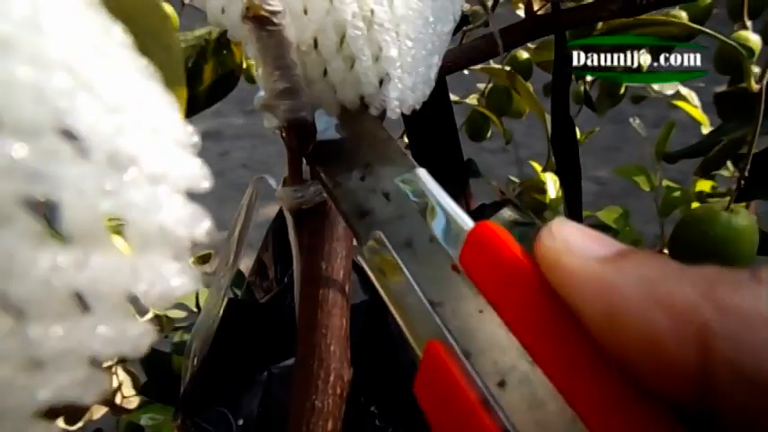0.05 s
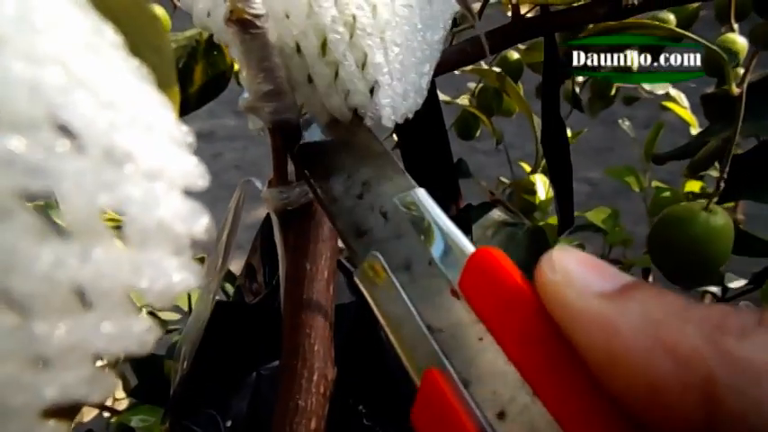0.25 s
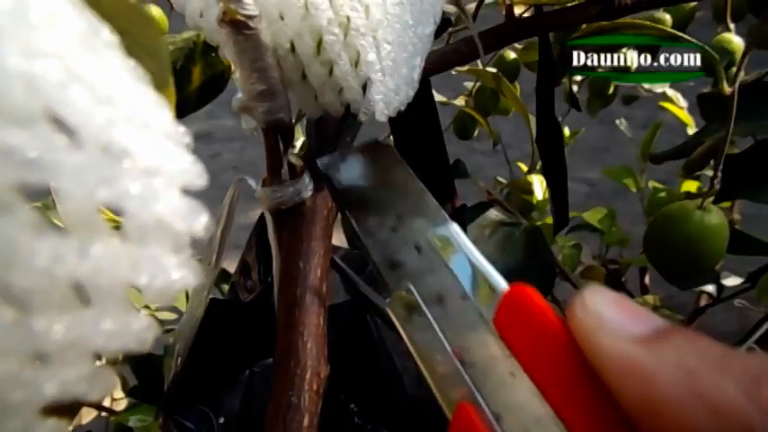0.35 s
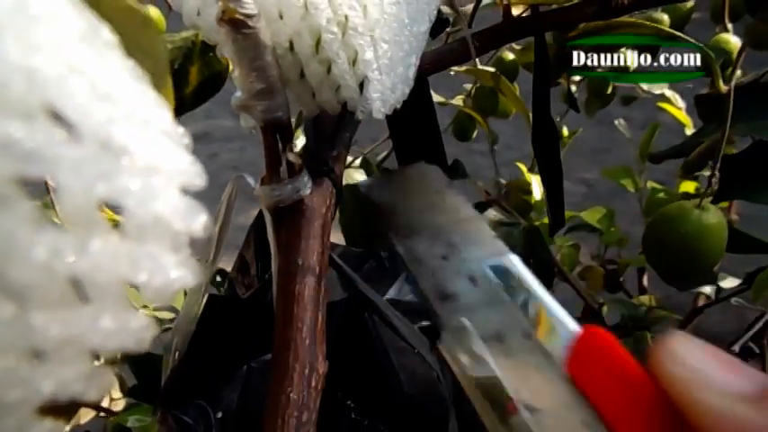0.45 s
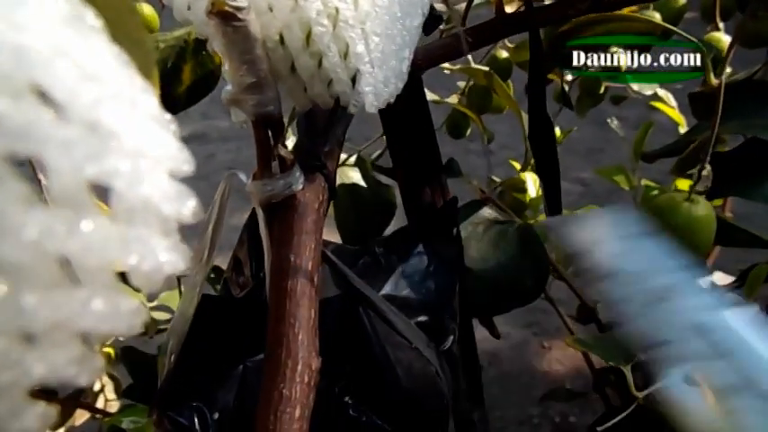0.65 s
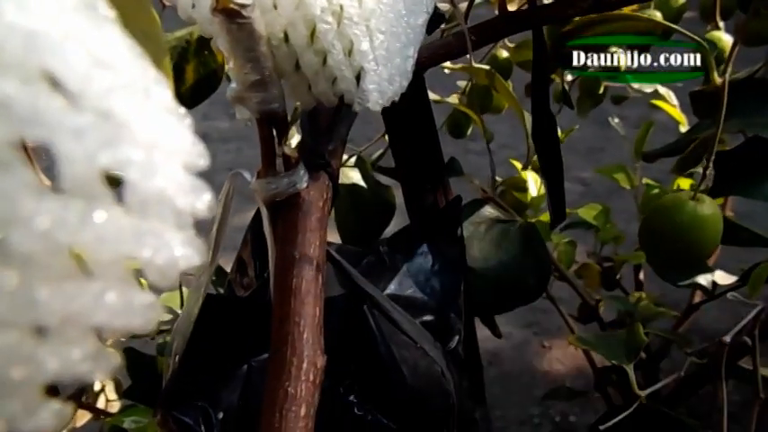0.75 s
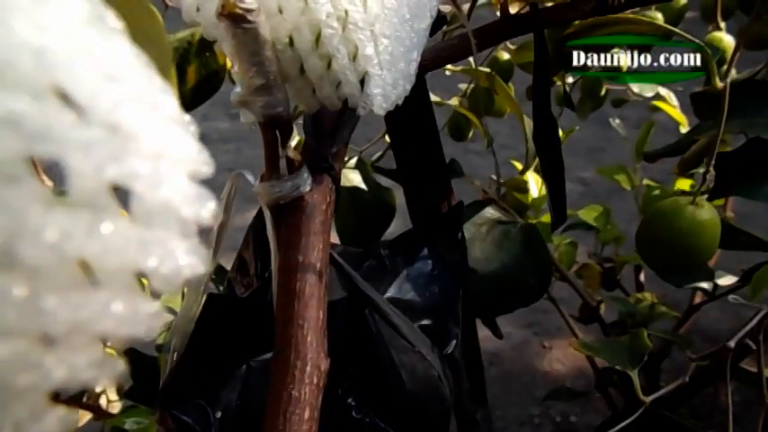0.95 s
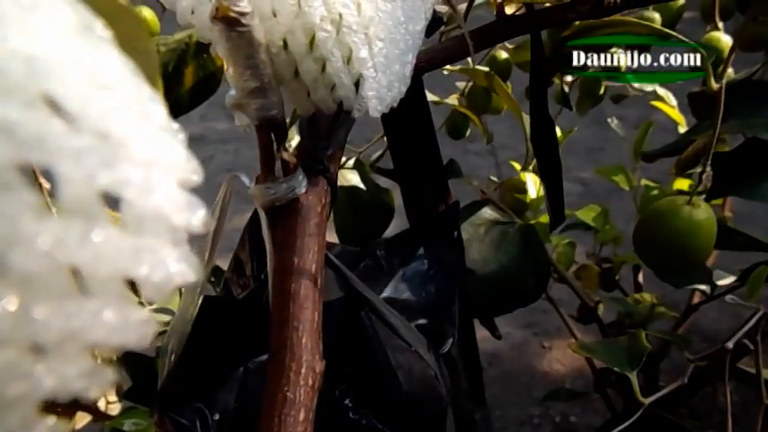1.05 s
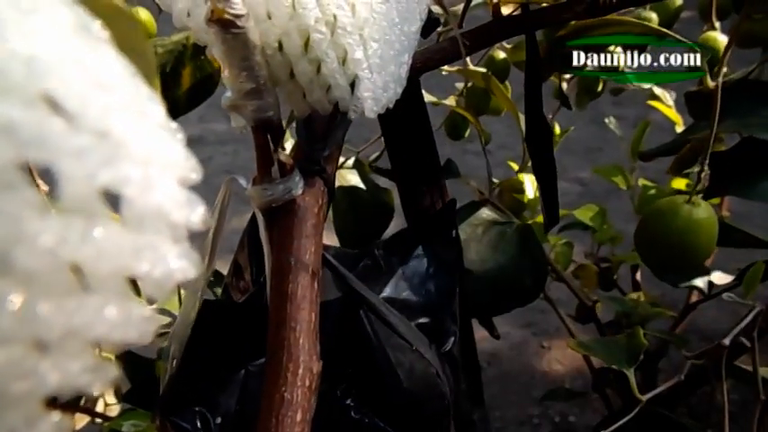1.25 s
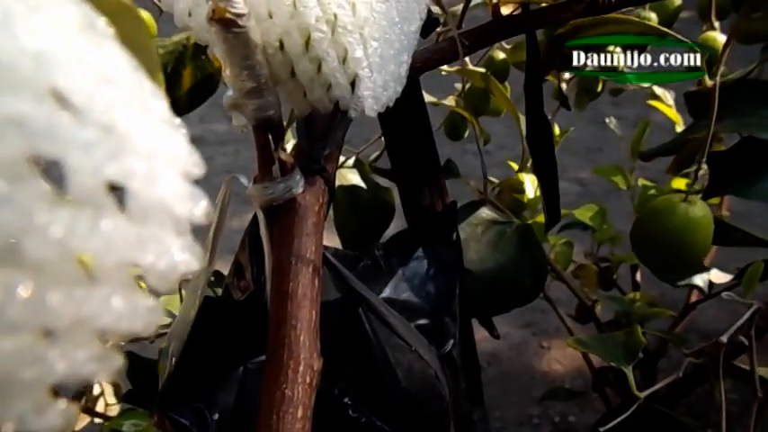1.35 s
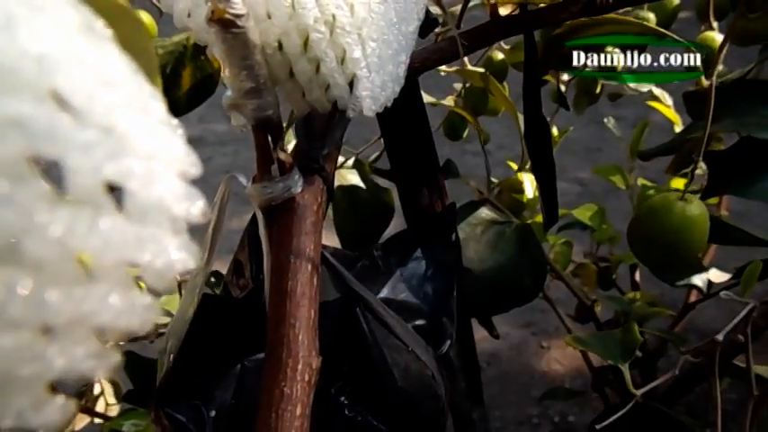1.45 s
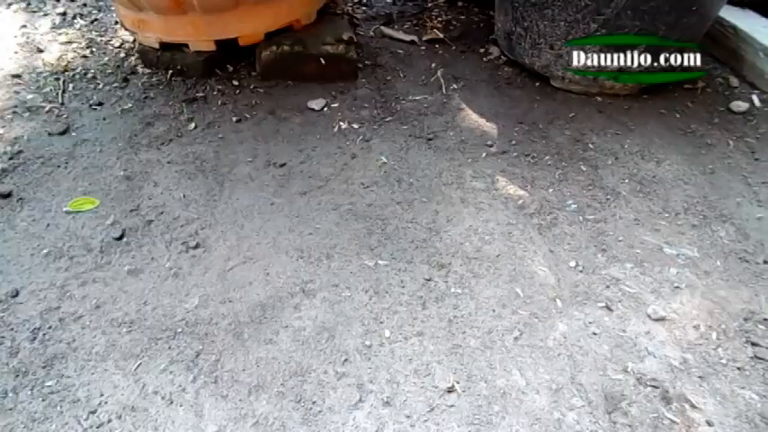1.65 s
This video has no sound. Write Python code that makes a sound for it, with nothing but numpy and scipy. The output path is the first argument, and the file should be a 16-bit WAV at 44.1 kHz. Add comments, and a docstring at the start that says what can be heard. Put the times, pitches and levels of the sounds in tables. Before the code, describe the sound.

Close, dry, nearly mono outdoor sound: one bright metallic snip of garden shears with a short woody knock, a quick reopening rattle, then quiet rustling, tiny ticks, far bird trills and steady hiss.

```python
"""Garden shears cutting a twig

Garden shears cut a twig close by: the blades snap shut and chatter, then rattle again as they spring open.
The shears are noise bursts exciting the modes of the steel, and the twig adds decaying sines.
Behind them leaves and hands rustle as moving bands of noise, with a few small dull ticks. Far birds trill
and pulse in diffuse echoes, one near chirp glides, a low cooing sounds, and steady hiss lies under all.
"""
import sys
import numpy as np
from scipy import signal
from scipy.fft import rfft, irfft, next_fast_len
from scipy.io import wavfile
from scipy.ndimage import uniform_filter1d, map_coordinates

SR = 44100
rng = np.random.default_rng(int(sys.argv[2]) if len(sys.argv) > 2 else 0)


def voltage_ratio(level):
    """Linear amplitude factor for a level in decibels (scalar or array-like)."""
    return 10 ** (np.asarray(level, float) / 20)


def persist_wave(psi):
    """Save psi, clipped to +-1, as 16-bit WAV."""
    counts = np.round(np.clip(psi, -1, 1) * 32767).astype(np.int16)
    wavfile.write(sys.argv[1], SR, np.atleast_2d(counts).T)


N = 74970  # samples, 1.7 s


def unit(x):
    """Normalization: scales a signal to an rms of 1."""
    return x / np.sqrt(np.mean(x ** 2) + 1e-20)


def along(points, hz):
    """Interpolation of (Hz, value) points on a logarithmic frequency axis."""
    f, v = np.transpose(points)
    return np.interp(np.log(hz + 1), np.log(f + 1), v)


def curves(rows):
    """Linear interpolation in time: one value per sample for each column after the time, ends held."""
    s, *cols = np.transpose(rows)
    return [np.interp(np.arange(N) / SR, s, c) for c in cols]


def filtered(x, response):
    """Linear filtering: multiplies the spectrum of x by a complex response of frequency."""
    n = x.shape[-1]
    m = next_fast_len(n + 4096)
    spectrum = rfft(x, m) * response(np.fft.rfftfreq(m, 1 / SR))
    return irfft(spectrum, m)[..., :n]


def wobble(rate):
    """Slow random modulation: a smooth curve through normal random knots, rate of them a second."""
    knots = rng.standard_normal(int(N * rate / SR) + 4)
    return map_coordinates(knots, [np.arange(N) * rate / SR])


def add(into, s, x):
    """Superposition: mixes x in at time s in seconds."""
    i = np.arange(len(x)) + round(s * SR)
    ok = (i >= 0) & (i < N)
    into[i[ok]] += x[ok]


def resonance(f, hz, width_hz):
    """A damped oscillator driven by a force: a causal resonance of gain 1 at its centre."""
    return 1j * f * width_hz / (hz * hz - f * f + 1j * f * width_hz + 1e-9)


def tail(x, t60):
    """Diffuse reverberation: convolution with decaying noise of energy 1, 60 dB down after t60 seconds."""
    t = np.arange(SR // 2) / SR
    h = rng.standard_normal(len(t)) * voltage_ratio(-60 * t / t60)
    return signal.fftconvolve(x, h / np.linalg.norm(h))[:N]


def hiss():
    """Steady air and microphone noise: stationary white noise shaped by a fixed spectrum."""
    # Spectral shape of the noise. Each row: frequency in Hz, relative density in dB.
    density = [(25, -32), (297, -8), (460, -7), (1080, -12.5), (1170, -10.5), (15100, -23), (17800, -29)]
    noise = filtered(rng.standard_normal(N), lambda f: voltage_ratio(along(density, f)))
    return voltage_ratio(-66.5) * unit(noise)


def coos():
    """Low cooing by frequency modulation: nearly pure tones on one faintly wavering pitch."""
    # Soft notes. Each row: start in seconds, length in seconds, level in dB.
    notes = [(1.312, 0.035, -61), (1.348, 0.043, -58.5), (1.403, 0.026, -59.5), (1.428, 0.06, -68.5)]
    t = np.arange(N) / SR
    shape = np.zeros(N)
    for s, length, db in notes:
        progress = np.clip((t - s) / length, 0, 1)
        shape += voltage_ratio(db) * np.sin(np.pi * progress) ** 0.83
    pitch_hz = 600 * (1 + 0.0061 * wobble(24.9))
    tone = np.sin(2 * np.pi * np.cumsum(pitch_hz) / SR)
    return np.sqrt(2) * shape * tone


def far_trills():
    """Far trills by granular superposition: clouds of short notes of random pitch, in diffuse echoes."""
    # Note clouds. Each row: start in seconds, length in seconds, level of the loudest notes in dB,
    # middle pitch in Hz, reach of pitch up and down in Hz.
    trills = [(-.03, 0.065, -65.5, 4800, 500), (0.427, .12, -67, 4200, 614), (0.584, 0.097, -69, 3520, 614),
              (0.682, 0.083, -71.5, 2320, 400), (0.946, 0.069, -72.5, 4550, 950),
              (1.383, 0.04, -74.5, 4120, 91), (1.371, 0.16, -67, 4760, 947), (1.639, .08, -76, 3850, 159)]
    far, t = np.zeros(N), np.arange(600) / SR
    centre_s = 0.0039  # middle of a note; half of this is its half-width to 1/e
    envelope = np.exp(-((t - centre_s) / centre_s * 2) ** 2)
    for s, length, db, hz, spread_hz in trills:
        for at, (pitch, size) in zip(rng.random(200), rng.uniform(-0.994, 1, (200, 2))):
            note = np.sin(2 * np.pi * (hz + spread_hz * pitch) * t) * envelope
            add(far, s + at * length, note * voltage_ratio(db - 4 + 3.9 * size))
    return far + voltage_ratio(-4) * tail(far, 0.5)


def far_caller():
    """Regular repetition of Gaussian tone pulses: each note sounds four times, slightly detuned."""
    # Repeated notes. Each row: middle of the first pulse in seconds, peak level in dB, pitch in Hz.
    pulses = [(1.401, -59, 4570), (1.379, -64, 5690)]
    every_s, half_width_s = 0.042, 0.007  # half-width to 1/e
    calls, t = np.zeros(N), np.arange(-1000, 1000) / SR
    for s, db, hz in pulses:
        for k, pitch in enumerate(rng.standard_normal(4)):
            tone = np.sin(2 * np.pi * hz * (1 + 0.01 * pitch) * t)
            pulse = tone * np.exp(-(t / half_width_s) ** 2)
            add(calls, s + k * every_s + t[0], pulse * voltage_ratio(db))
    return calls + voltage_ratio(-4) * tail(calls, 0.17)


def near_chirp():
    """A frequency glide down and up, with one discrete reflection and a short diffuse echo."""
    # Path of the glide. Each row: time in seconds, pitch in Hz, level in dB.
    path = [(.984, 5510, -84), (.987, 4640, -51), (.992, 3790, -57.5), (.999, 3300, -61),
            (1.006, 3670, -63), (1.012, 4800, -61), (1.016, 5000, -100)]
    hz, db = curves(path)
    direct = voltage_ratio(db) * np.sin(2 * np.pi * np.cumsum(hz) / SR)  # phase is the integral of pitch
    near = direct + voltage_ratio(-15) * np.roll(direct, round(0.0025 * SR))  # reflection 2.5 ms later
    return near + voltage_ratio(-4) * tail(near, 0.17)


def rustle():
    """Hands and leaves as band-limited noise: a low band shifts with movement, a bright part is grainy."""
    # Course of the movement. Each row: time in seconds, level of the low part in dB,
    # centre of the low part in Hz, level of the bright part over the low part in dB.
    movement = [(0, -66.5, 500, 5), (.06, -62, 740, -2), (.14, -62.5, 960, -1.5), (.19, -67, 790, 4.5),
                (.24, -66, 696, 8), (.38, -72.5, 920, 11.5), (.575, -84.5, 823, -20), (.59, -68, 906, -5),
                (.66, -72, 1000, 2), (.92, -73, 955, -10), (1.05, -75.5, 704, -11), (1.26, -68, 820, -3.5),
                (1.6, -70.5, 730, -5.5), (1.65, -68, 690, 2.5), (1.7, -57.5, 690, -1.5)]
    # Spectral shape of the bright part. Each row: frequency in Hz, relative density in dB.
    bright_density = [(600, -13), (1800, 2.5), (4000, 1.5), (17000, -8.5)]
    low_oct = 0.79  # half-width of the low band to 1/e, octaves
    db, centre_hz, bright_db = curves(movement)

    f, t, z = signal.stft(rng.standard_normal(N), SR, nperseg=512)
    centre = np.interp(t, np.arange(N) / SR, centre_hz)
    octaves_off = np.log2((f[:, None] + 1) / centre)
    band = np.exp(-(octaves_off / low_oct) ** 2)
    low = signal.istft(z * band, SR, nperseg=512)[1][:N]

    grain = rng.standard_normal(N) * voltage_ratio(1.7 * wobble(270))
    bright = filtered(grain, lambda f: voltage_ratio(along(bright_density, f)))

    # each part flutters in level on its own
    low = unit(low) * voltage_ratio(1.24 * wobble(40.06))
    bright = unit(bright) * voltage_ratio(bright_db + 1.16 * wobble(30.15))
    return voltage_ratio(db) * (low + bright)


def ticks():
    """Short dull cracks among the leaves: decaying noise excites a broad, heavily damped resonance."""
    # Small cracks. Each row: start in seconds, peak level in dB, pitch in Hz.
    cracks = [(0.148, -51, 1050), (0.583, -55, 1080), (0.642, -50, 2600), (1.361, -47, 3100)]
    t60, relative_width = 0.022, 1.54  # decay of the noise in s; resonance width over pitch
    out, t = np.zeros(N), np.arange(2048) / SR
    for s, db, hz in cracks:
        burst = rng.standard_normal(len(t)) * voltage_ratio(-60 * t / t60)
        hit = filtered(burst, lambda f: resonance(f, hz, relative_width * hz) ** 2)
        add(out, s, voltage_ratio(db) * hit / np.abs(hit).max())
    return out


def shears():
    """Impact excitation of modes: blows and sprays of micro-impacts ring the steel; the twig knocks."""
    # Metal and wood contacts. Each row: start in seconds, level in dB as the peak of a sine as strong as
    # the loudest millisecond, strongest pitch of the spray in Hz, 60 dB decay of the spray in seconds.
    contacts = [(0.247, -36, 3000, 0.0094), (0.2473, -14, 4550, 0.011), (0.249, -17.5, 6370, 0.044),
                (0.254, -18, 4130, 0.011), (.2603, -19, 2640, 0.017), (.2617, -14.5, 2240, 0.0063),
                (0.2649, -15.5, 4950, 0.0075), (0.269, -24.5, 3500, 0.023), (0.2741, -33, 3970, 0.026),
                (0.281, -27.5, 6200, 0.023), (0.2878, -33, 5000, 0.04), (0.2944, -46, 4000, 0.025),
                (0.301, -45, 1800, 0.0184), (0.307, -37, 4500, 0.024), (0.3293, -39.5, 3000, 0.0044),
                (0.3339, -36, 1600, 0.019), (0.338, -20.5, 3900, 0.013), (0.3413, -27.5, 5050, 0.016),
                (.3448, -23.5, 4200, 0.014), (0.3522, -27, 4240, 0.013), (0.3576, -32.5, 4200, 0.014),
                (0.364, -39.5, 4030, 0.018), (0.368, -40.5, 4260, 0.011)]
    # Modes of the shears. Each row: frequency in Hz, width in Hz, gain in dB with the blades shut,
    # gain in dB with the blades open.
    modes = [(1120, 340, -12, -4.5), (1598, 25.4, -6, 11), (2150, 580, -5.5, -13), (2700, 66, -7.5, -6.5),
             (3500, 290, -12, -16), (4000, 230, 2.5, 4), (4780, 370, -6, -10), (5230, 99, -3.5, -4.5),
             (6070, 260, -6, -35), (7490, 530, -5, -18), (11770, 480, -5, -6.5), (13900, 380, -6, -4)]
    # Knock of the parting twig. Each row: frequency in Hz, level in dB ahead of the swell, decay and
    # bass loss, 60 dB decay in seconds.
    twig = [(450, -34.5, 0.066), (829, -30, 0.051), (1197, -27, 0.054)]
    opens_s, parts_s = 0.32, 0.2474  # the blades ring as open from here; the twig parts
    rise_s = 0.00035  # how fast a spray or knock swells
    blow = 1.94  # first impact, against a spray of rms 1 before swell and decay
    lean_width, floor_db = 0.85, -9  # width of a spray's lean over its pitch; flat part under the lean
    crack_db = -14  # bare crack under the ring
    low_cut_hz = 516  # the microphone's bass loss on close sharp sounds, 12 dB down here

    def steel(f, is_open):
        ring = 0
        for k, (hz, width_hz, *gains_db) in enumerate(modes):
            ring = ring + (-1) ** k * voltage_ratio(gains_db[is_open]) * resonance(f, hz, width_hz)
        return ring

    def low_cut(f):
        return (1j * f / (low_cut_hz + 1j * f)) ** 4

    out, t = np.zeros(N), np.arange(8192) / SR
    swell = 1 - np.exp(-t / rise_s)
    for s, db, hz, t60 in contacts:
        spray = rng.standard_normal(len(t)) * voltage_ratio(-60 * t / t60) * swell
        spray[0] = blow

        def response(f):
            lean = voltage_ratio(floor_db) + resonance(f, hz, lean_width * hz)
            body = steel(f, int(s > opens_s)) + voltage_ratio(crack_db)
            return lean * body * low_cut(f)

        hit = filtered(spray, response)
        loudest = uniform_filter1d(hit ** 2, size=44).max()  # mean square over about 1 ms
        add(out, s, voltage_ratio(db) * hit / np.sqrt(loudest * 2))

    knock = sum(voltage_ratio(db - 60 * t / t60) * np.sin(2 * np.pi * hz * t) for hz, db, t60 in twig)
    add(out, parts_s, filtered(knock * swell, low_cut))
    return out + voltage_ratio(-36.5) * tail(out, 0.12)  # what walls and leaves send back


def scene():
    """Nearly mono mix: a faint, briefly smeared copy of the whole mix is added left and subtracted right."""
    # Level of the smeared side copy. Each row: frequency in Hz, side over mid in dB.
    side_level = [(30, -22), (250, -34), (1500, -48), (5000, -28.5), (12000, -33.5)]
    birds = far_trills() + far_caller() + near_chirp()
    mid = hiss() + coos() + birds + rustle() + ticks() + shears()
    side = filtered(tail(mid, 0.008), lambda f: voltage_ratio(along(side_level, f)))
    return np.array([mid + side, mid - side])


def band_limit(x):
    """A steep low-pass at the top of the band."""
    return signal.sosfilt(signal.butter(12, 18000, fs=SR, output="sos"), x)


def record(dry):
    """Band limitation: nothing from 17.9 kHz up passes into the finished mix."""
    mix = filtered(dry, lambda hz: hz < 17900)
    return band_limit(mix)


dry = scene()
out = record(dry)
persist_wave(out)
```